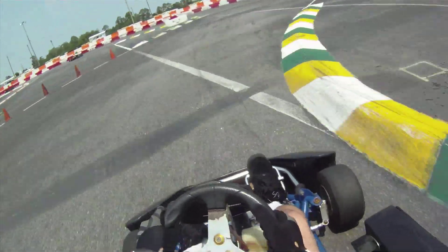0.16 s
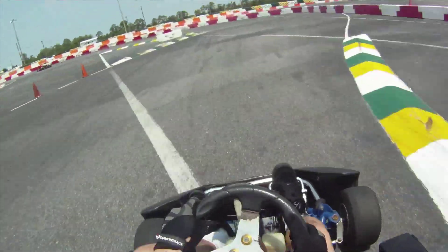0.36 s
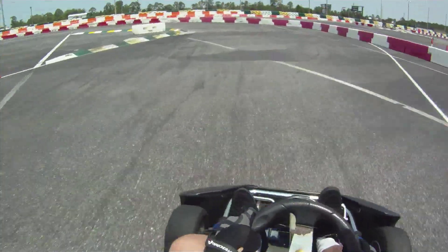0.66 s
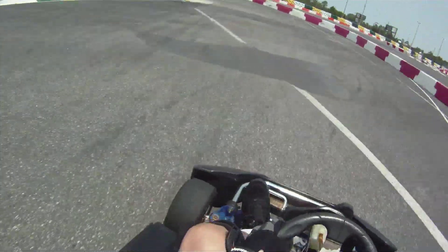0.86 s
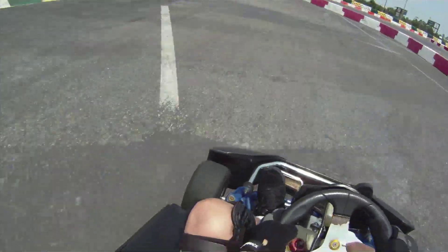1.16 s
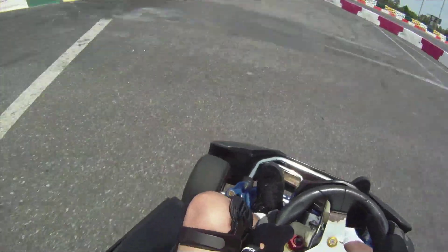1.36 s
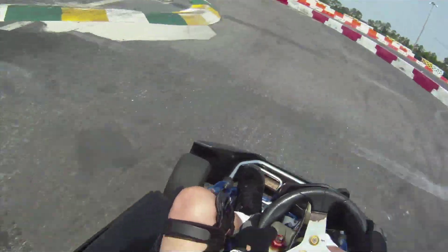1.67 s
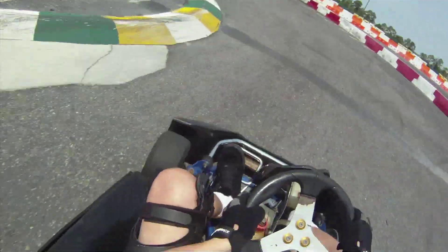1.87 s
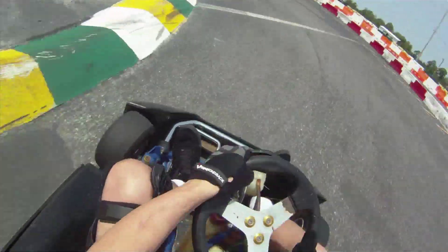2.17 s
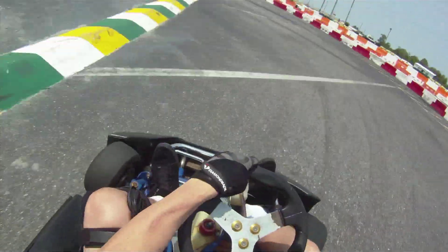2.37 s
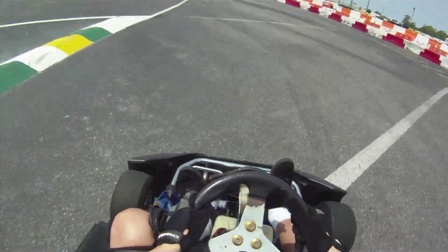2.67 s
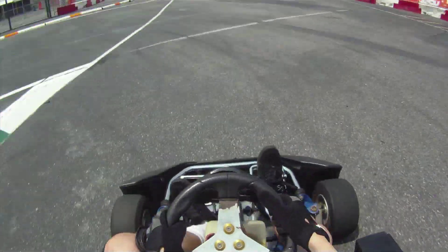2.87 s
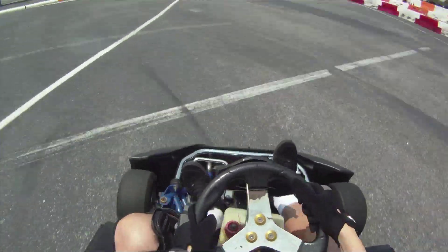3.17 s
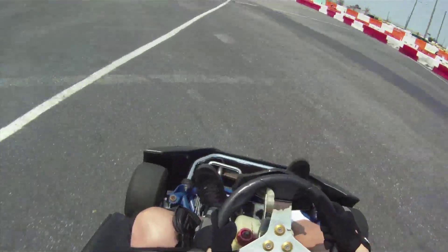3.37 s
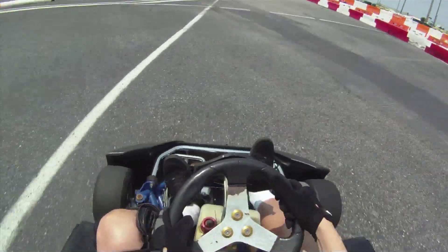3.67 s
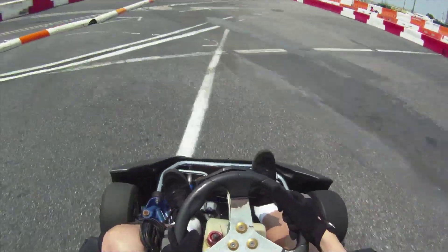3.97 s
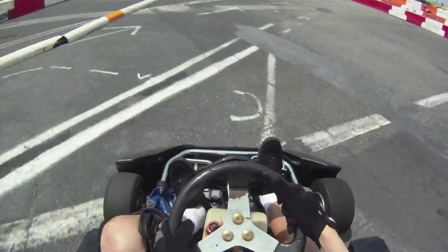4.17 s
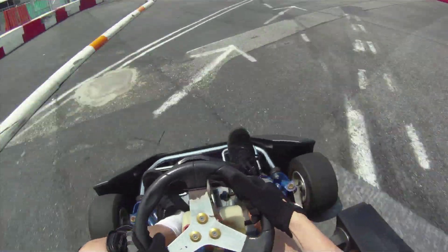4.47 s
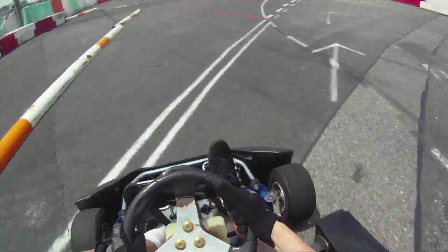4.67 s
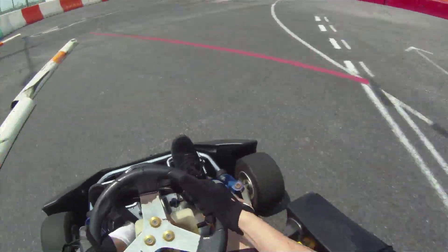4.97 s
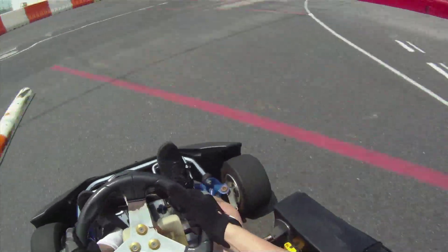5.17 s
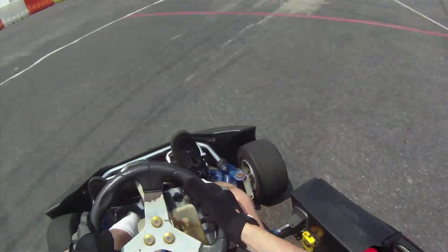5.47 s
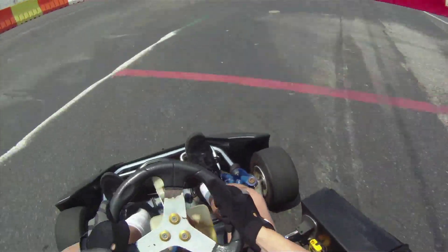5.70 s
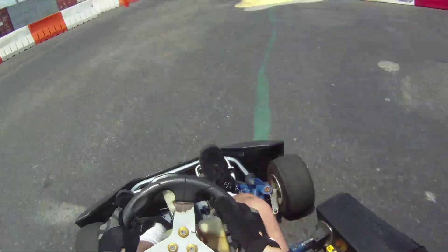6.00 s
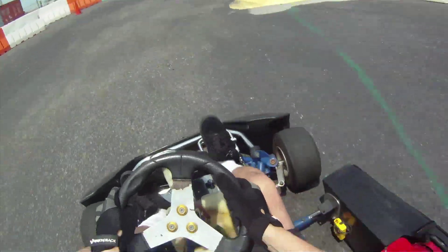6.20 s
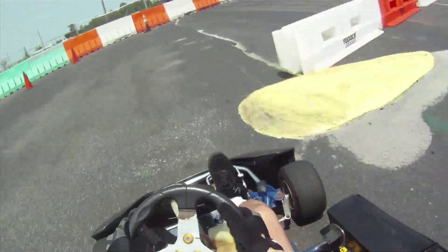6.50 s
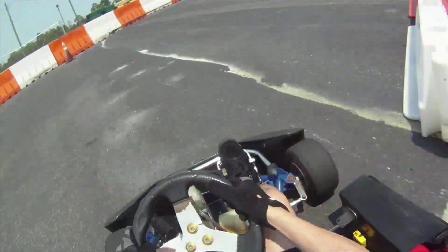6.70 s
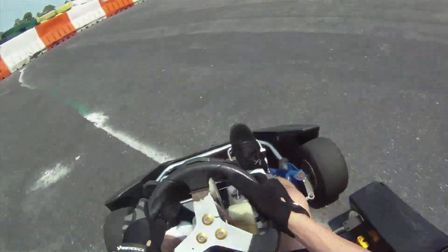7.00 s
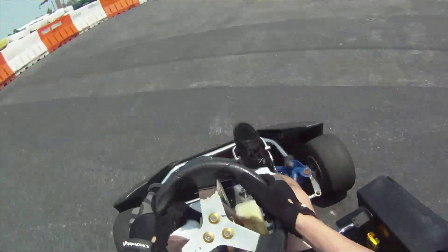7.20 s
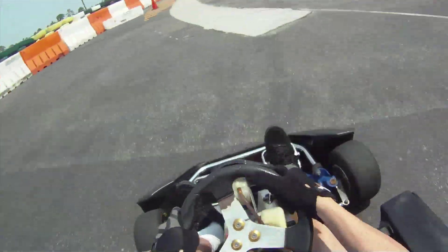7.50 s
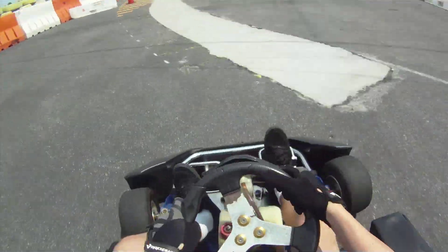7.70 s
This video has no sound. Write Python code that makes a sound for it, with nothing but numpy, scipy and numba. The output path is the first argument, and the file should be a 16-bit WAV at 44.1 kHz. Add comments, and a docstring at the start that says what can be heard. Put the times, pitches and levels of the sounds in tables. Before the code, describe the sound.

Close, on-board sound of a small go-kart lapping outdoors, with constant metallic rattling and a deep rumble shaking the microphone. The four-stroke engine starts off the throttle, then chugs and rasps under power, interrupted by one loud thump and crack. It builds speed, eases off with a buzzing rattle and picks up again. The brake gives a tiny squeak before more bumps thud through the chassis and knock the microphone's case.

```python
"""An outdoor kart track, heard from on board a lapping go-kart through the microphone of a cased camera.
The tyres drum underneath, road and crank shake the mount, and bumps thud in the chassis and knock the
case; the camera's limiter ducks after the hardest. Chain, engine parts and a loose panel clatter on, also
off the throttle, and the brake squeals briefly. Close by, the single-cylinder four-stroke engine drones
through its silencer and rasps at each firing."""
import sys
import numpy as np
from scipy import signal
from scipy.fft import rfft, irfft
from scipy.io import wavfile
from scipy.ndimage import uniform_filter1d, map_coordinates
from numba import njit

SR = 44100
rng = np.random.default_rng(int(sys.argv[2]) if len(sys.argv) > 2 else 0)


def digitize_waveform(pressure):
    """Quantize a signal to 16-bit integers and store it at the path in sys.argv[1].

    Rows of a 2-D input are taken as channels; values are limited to [-1, 1].
    """
    field = np.atleast_2d(pressure).T
    bounded = np.clip(field, -1, 1)
    quanta = np.round(bounded * 32767).astype(np.int16)
    wavfile.write(sys.argv[1], SR, quanta)


N = 346185
TIME = np.arange(N) / SR


def undb(db):
    """Decibels to gain."""
    return 10 ** (np.asarray(db) / 20)


def unit(x):
    """Scale to rms 1."""
    return x / np.sqrt(np.mean(x ** 2))


def curve(table):
    """Rows of (time_s, value), joined by straight lines."""
    return np.interp(TIME, *np.transpose(table))


def held(start_s, end_s, ramp_s):
    """Rises from 0 to 1 around the start, holds, and falls back around the end."""
    return np.clip(.5 + np.minimum(TIME - start_s, end_s - TIME) / ramp_s, 0, 1)


def swells(table):
    """Bell-shaped rises, one for each (centre_s, height, half_width_s)."""
    return sum(height * np.exp(-((TIME - s) / width_s) ** 2) for s, height, width_s in table)


def walk(rate_hz):
    """Smooth random wander with spread 1."""
    hold = int(SR / rate_hz)
    steps = np.repeat(rng.standard_normal(N)[:N // hold + 1], hold)
    return unit(uniform_filter1d(uniform_filter1d(steps, hold), hold)[:N])


def grains(per_s, spread_db):
    """Dense tiny impacts of uneven size."""
    hits = (rng.random(N) < per_s / SR) * rng.choice([-1, 1], N)
    return unit(hits * undb(spread_db * np.clip(rng.standard_normal(N), -2, 2)))


def colour(x, spectrum, size=16384):
    """Minimum-phase filter through the given (pitch_hz, level_db) points."""
    hz, db = np.transpose(spectrum)
    grid = np.maximum(np.fft.rfftfreq(size, 1 / SR), 1)
    cepstrum = irfft(np.log(undb(np.interp(np.log(grid), np.log(hz), db))))
    cepstrum[1:size // 2] *= 2
    cepstrum[size // 2 + 1:] = 0
    return signal.fftconvolve(x, irfft(np.exp(rfft(cepstrum))))[:N]


def resonate(x, hz, *widths_hz):
    """Two-pole resonances in series, one for each width, with gain 1 at the centre."""
    for width_hz in widths_hz:
        x = signal.lfilter(*signal.iirpeak(hz, hz / width_hz, fs=SR), x)
    return x


def ringing(age, modes):
    """Decaying modes, age seconds after a blow."""
    return sum(undb(db) * np.sin(2 * np.pi * hz * age) * 1000 ** (-age / t60) for hz, t60, db in modes)


def struck(cycle, firing_hz, modes, lead_s, rise_s, scatter_db, detune):
    """Modes rung once an engine cycle, each time a little different in strength and pitch."""
    turn = cycle + lead_s * firing_hz
    firing, age = turn.astype(int), turn % 1 / firing_hz
    out = np.zeros(N)
    for hz, t60, db in modes:
        size, bend, phase = rng.standard_normal((N // 1000, 3))[firing].T
        tone = np.sin(2 * np.pi * (hz * (1 + detune * bend) * age + phase))
        out += undb(db + scatter_db * size) * tone * 1000 ** (-age / t60)
    return out * (1 - np.exp(-(age / rise_s) ** 2))


# Presses of the throttle pedal: down_s, up_s, load_db, opening_rasp_db
PEDAL_PRESSES = [(1.41, 5.37, 1, 5.5), (6.33, 6.88, -0.8, 3.5), (7.05, 7.9, -3.5, 3)]
def throttle(coast_db=-8, coast_rasp_db=-21, fade_db_per_s=3.0):
    """Firing strength and rasp in dB; the rasp is hardest as the pedal goes down, then mellows."""
    load_db, gas_db = coast_db, coast_rasp_db
    for down_s, up_s, db, rasp_db in PEDAL_PRESSES:
        pedal = held(down_s, up_s, ramp_s=0.032)
        load_db += pedal * (db - coast_db)
        gas_db += pedal * (rasp_db - fade_db_per_s * (TIME - down_s) - coast_rasp_db)
    return load_db, gas_db


def tyres(level_db=-49, pitch_hz=98, width_hz=85):
    """Below the microphone, the hard little tyres drum on the asphalt all the way."""
    drum = resonate(rng.standard_normal(N), pitch_hz, width_hz, width_hz)
    return undb(level_db) * unit(drum * undb(2.4 * walk(6)))


# Touches of the pad on the brake disc: centre_s, gain_db, half_width_s
PAD_TOUCHES = [(1.536, -2, 0.012), (6.865, -6, .02), (7.19, 1.5, 0.025), (7.732, 0, 0.006)]
# Tones of the squeal: pitch_hz, level_db
SQUEAL_TONES = [(2864, -37), (9135, -46)]
def brake(waver=0.0068):
    """A pad brushes the disc and squeals briefly."""
    touch = swells((s, undb(db), width_s) for s, db, width_s in PAD_TOUCHES)
    squeal = np.zeros(N)
    for hz, db in SQUEAL_TONES:
        phase = 2 * np.pi * np.cumsum(hz * (1 + waver * walk(400))) / SR
        squeal += undb(db) * unit(np.sin(phase))
    return touch * squeal


def chain(cycle, over_cruise_hz, load_db, mesh_order=26, whip_order=29):
    """The chain whines on its sprocket as it pulls; at higher revs it whips and rattles just above."""
    whine = unit(np.sin(2 * np.pi * mesh_order * cycle + 0.73 * walk(30)) * undb(2 * walk(13)))
    jerk = 1.77 * np.sin(2 * np.pi * cycle + .5 * walk(5))
    slack = 1.1 * walk(90) + walk(10)
    rattle = unit(np.sin(2 * np.pi * whip_order * cycle + jerk + slack) * undb(2 * walk(11)))
    whine_db, rattle_db = -56 - 1.7 * over_cruise_hz, -49 + over_cruise_hz
    return undb(load_db) * (undb(whine_db) * whine + undb(rattle_db) * rattle)


def power_stroke(cycle, load_db):
    """The jolt that each firing gives the frame."""
    return undb(load_db) * np.exp(3 * (np.cos(2 * np.pi * (cycle - .04)) - 1))


def engine_ticks(cycle, patterns=4, size=1700):
    """Contacts that come back at the same crank angles every cycle, in slowly changing strengths."""
    out = np.zeros(N)
    for _ in range(patterns):
        contacts = grains(per_s=2000, spread_db=2)[:size]
        out += walk(6) * map_coordinates(contacts, [cycle % 1 * size], order=3, mode="wrap")
    return unit(out)


# Resonances of the tubular frame: pitch_hz, width_hz, level_db
FRAME_MODES = [(969, 68, 0), (1170, 49, -1), (1640, 46, -9), (2090, 93, -1)]
def frame(surge, drift_s=0.000597):
    """The steel tubes ring under the rattling; their pitches shift a little as the frame flexes."""
    out = np.zeros(N)
    for hz, width_hz, db in FRAME_MODES:
        ring = resonate(grains(per_s=700, spread_db=1.5) * surge, hz, width_hz, 3 * width_hz)
        flexed = np.arange(N) + drift_s * SR * walk(6)
        out += undb(db) * unit(map_coordinates(ring, [flexed], order=1, mode="nearest"))
    return unit(out)


# Clatter of the running gear along the track: time_s, level_db
GEAR_LEVEL = [(0, -31.5), (.3, -31), (.76, -32.5), (.95, -36.5), (1.3, -38.5), (1.5, -35), (1.9, -33.5),
              (2.35, -32), (2.9, -35.5), (3.5, -35.5), (4.5, -32.5), (5.34, -31.5), (5.43, -33.5),
              (5.75, -36.5), (5.95, -35), (6.3, -33.5), (6.9, -32), (7.4, -30.5), (7.85, -36)]
# Rattles in the coasting drive: centre_s, extra_clatter_db, extra_panel_db, half_width_s
DRIVE_RATTLES = [(0.301, 2, 5, 0.011), (0.474, 1, 12, .01), (0.717, 3.5, -13, 0.01),
                 (1.196, 2.5, -1, 0.031), (1.34, 4, 9, 0.013), (5.87, 3.5, 3, 0.014), (5.945, 6, 22, 0.02),
                 (6.02, 0, 7, 0.017), (6.154, 1.5, 13, 0.0096), (6.223, 7, 17, 0.016), (6.33, 4, 1, 0.0076)]
# Tone of the clatter and of the hiss above it: pitch_hz, level_db
CLATTER_SPECTRUM = [(60, -25), (150, -6.5), (260, -8.5), (520, -10), (820, -7), (965, 0.5), (1075, 0.5),
                    (1190, 0.5), (1480, -5.5), (1650, -4), (1850, -8), (2080, -1.5), (2450, -5),
                    (2720, -5.5), (3150, -15), (4200, -29), (6000, -44)]
HISS_SPECTRUM = [(2500, -6.5), (3150, 2.5), (3450, 11), (3850, 7.5), (4300, -1.5), (4900, 5.5), (5700, -2),
                 (6400, -1.5), (7050, 2), (7650, -4.5), (8400, 3.5), (8850, 0.5), (9400, 4.5), (9900, 7.5),
                 (10300, -3), (11000, -33)]
def running_gear(cycle, load_db, throb=0.48):
    """Valve gear ticks with the crank and the tyres patter at random; each power stroke jolts the parts."""
    rattle_db = swells((s, db, width_s) for s, db, _, width_s in DRIVE_RATTLES)
    surge = (1 + throb * power_stroke(cycle, load_db)) * undb(1.17 * walk(70))
    patter = unit(colour(grains(per_s=1800, spread_db=1.0) * surge, CLATTER_SPECTRUM))
    # the valve gear's small parts give no bass
    ticks = signal.lfilter(*signal.butter(2, 380, "high", fs=SR), engine_ticks(cycle) * surge)
    valves = unit(colour(ticks, CLATTER_SPECTRUM))
    hiss = unit(colour(grains(per_s=8000, spread_db=1.5) * surge, HISS_SPECTRUM))
    parts = undb(-2.5) * patter + undb(-5) * valves + undb(-9.5) * hiss + undb(-7) * frame(surge)
    return undb(curve(GEAR_LEVEL) + rattle_db) * parts


def panel(cycle, over_cruise_hz, load_db, pitch_hz=2140, width_hz=230, throb=0.29, relative_db=-14):
    """The engine's ticks buzz a loose panel, more at high revs and when the slack drive rattles."""
    ticks = engine_ticks(cycle) * (1 + throb * power_stroke(cycle, load_db))
    buzz = unit(resonate(ticks, pitch_hz, width_hz, 2 * width_hz))
    rattle_db = swells((s, db, width_s) for s, _, db, width_s in DRIVE_RATTLES)
    drive_db = 1.8 * over_cruise_hz - 0.14 * load_db + rattle_db
    return undb(curve(GEAR_LEVEL) + relative_db + drive_db) * buzz


# Tight corners of the track: entry_s, exit_s, extra_db
TIGHT_CORNERS = [(1.798, 2.887, 7.5), (6.0, 8.1, 8)]
# Rough patches of asphalt: centre_s, extra_db, half_width_s
ROUGH_PATCHES = [(.28, 8, 0.1), (.55, 5.5, 0.11), (2.12, 11, 0.034), (2.47, 8.5, 0.094), (4.88, 10, 0.053),
                 (6.42, 7, 0.12), (7.7, 6.5, 0.11)]
# Tone of the road's jolts: pitch_hz, level_db
JOLT_SPECTRUM = [(10, -21.5), (20, -1.5), (30, -4.5), (40, 5), (50, -8.5), (62, -17.5), (85, -31),
                 (130, -42), (200, -39.5), (400, -58)]
def road_shake(straight_db=-35.5):
    """The road jolts the camera, harder on rough asphalt and where the tyres scrub through corners."""
    corner_db = sum(db * held(entry_s, exit_s, ramp_s=0.55) for entry_s, exit_s, db in TIGHT_CORNERS)
    jolts = unit(colour(rng.standard_normal(N), JOLT_SPECTRUM))
    # the rubber of the mount stiffens against large swings
    shake = unit(colour(np.tanh(0.6 * jolts), [(10, -2.5), (60, 2), (140, 1), (400, -12), (1200, -29)]))
    return undb(straight_db + corner_db + swells(ROUGH_PATCHES)) * shake


# Shake of the crank at the camera: time_s, level_db
CRANK_LEVEL = [(0, -41.5), (1.1, -41), (1.6, -30.5), (2.55, -29.5), (3, -32.5), (4.1, -36), (5, -50.5),
               (5.6, -32), (6.1, -35), (6.5, -25.5), (7.4, -22), (7.85, -29.5)]
def crank_shake(cycle):
    """The crank turns twice per firing and hums through the mount into the microphone."""
    hum = np.sin(2 * np.pi * (2 * cycle - .03))
    return undb(curve(CRANK_LEVEL)) * unit(hum * undb(1.13 * walk(3.86)))


# Bumps in the track: start_s, level_db, push_s
TRACK_BUMPS = [(1.474, -25, 0.0041), (2.357, -13.5, 0.014), (2.439, 0.5, 0.0097), (7.594, -10, 0.0079),
               (7.6952, -5, 0.00507), (7.705, -14, 0.0049), (7.84, -6, 0.0094)]
# Modes of the camera mount: pitch_hz, t60_s, level_db
MOUNT_MODES = [(39.43, 1, -7.5), (87, 0.15, -14), (122.4, 0.12, -5.5)]
def mount_swing(rise_s=0.0035):
    """Each bump pushes the camera one way and back, and it swings on in its mount."""
    out = np.zeros(N)
    for start_s, db, push_s in TRACK_BUMPS:
        age = np.maximum(TIME - start_s, 0)
        push = 0.72 * np.sin(2 * np.pi * np.minimum(age / push_s / 2, 1))
        out -= undb(db) * (push + ringing(age, MOUNT_MODES)) * (1 - np.exp(-age / rise_s))
    return out


# Modes of the chassis: pitch_hz, t60_s, level_db
CHASSIS_MODES = [(507, 0.0084, 0), (956, 0.017, 0), (1900, 0.005, -15), (2650, 0.012, -19)]
def chassis_thud(start_s=7.7008, gain_db=-2.5, rise_s=0.00032):
    """The chassis bottoms out on a bump: one heavy, dull blow with a soft contact."""
    age = np.maximum(TIME - start_s, 0)
    return undb(gain_db) * ringing(age, CHASSIS_MODES) * (1 - np.exp(-(age / rise_s) ** 2))


# Knocks right at the microphone: start_s, peak_db, high_cut_hz, contact_s, low_cut_hz
CASE_KNOCKS = [(1.777, -20, 7000, 0.0036, 1800), (2.4331, 5.5, 5060, 0.00055, 770),
               (2.4342, 1, 4500, 0.00034, 610), (2.444, 1, 5100, 0.00081, 1600),
               (6.0924, -5.5, 5400, 0.00029, 1270), (7.5814, -5, 4500, 0.00071, 1050),
               (7.605, -14.5, 6000, 0.00054, 1100), (7.6703, -23, 9000, .0007, 720),
               (7.6854, -11, 3000, 0.00052, 700), (7.7114, -6, 3500, 0.00022, 720),
               (7.842, -12.5, 6000, 0.0032, 724)]
# Modes of the camera case: pitch_hz, t60_s, level_db
CASE_MODES = [(570, 0.011, 7.5), (1030, 0.025, -3.5), (1206, 0.017, 0), (1540, 0.0039, 2), (2170, 0.01, 1),
              (2460, 0.022, -4.5), (2760, 0.008, -9), (3480, 0.0059, -10.5), (4540, 0.0059, -17),
              (8100, 0.005, -6), (9680, 0.011, 3.5)]
def case_knocks(crunch=0.25, crack=0.3):
    """The case hits its mount, grinds and rings; each knock has its own brightness and length of grind."""
    out = np.zeros(N)
    age = TIME[:SR // 10]
    for start_s, peak_db, high_cut_hz, contact_s, low_cut_hz in CASE_KNOCKS:
        force = crunch * rng.standard_normal(len(age)) * np.exp(-age / contact_s)
        force[0] += 1
        ring = signal.fftconvolve(force, ringing(age, CASE_MODES))[:len(age)]
        blow = ring + crack * np.diff(force, prepend=0)
        blow = signal.lfilter(*signal.butter(2, high_cut_hz, fs=SR), blow)
        blow = signal.lfilter(*signal.butter(2, low_cut_hz, "high", fs=SR), blow)
        start = int(start_s * SR)
        out[start:start + len(age)] += (undb(peak_db) * blow / np.abs(blow).max())[:N - start]
    return out


# Modes of the engine's metal parts: pitch_hz, t60_s, level_db
METAL_MODES = [(1110, 0.05, -41), (2085, 0.08, -35.5), (2293, 0.05, -34.5), (2570, 0.048, -32.5)]
# Strength of their clank along the track: time_s, gain_db
CLANK_GAIN = [(0, -4), (2.3, -20), (2.7, 0.5), (3.7, -1.5), (5, -1), (5.8, -3), (6.4, 5), (7.85, -5)]
def engine_clank(cycle, firing_hz, load_db):
    """Each power stroke sets the engine's metal parts clanking, harder under load."""
    ring = struck(cycle, firing_hz, METAL_MODES, lead_s=0.0042, rise_s=0.0034, scatter_db=2.5, detune=0.015)
    return undb(load_db + curve(CLANK_GAIN)) * ring


# Tone of the silencer: pitch_hz, level_db
SILENCER_SPECTRUM = [(60, -13), (100, -2), (120, -2), (135, 4.5), (160, -0.5), (188, -8), (225, -9),
                     (280, -5.5), (340, -11.5), (410, -6.5), (500, -21.5), (600, -15)]
def silencer(cycle, firing_hz, over_cruise_hz, load_db, gas_db, level_db=-41, odd_db=-1.5, rough_db=2.2):
    """The silencer smooths the firings into a wavering drone, louder under load and at high revs."""
    orders = np.zeros(N)
    for order in range(3, 21):
        tone_db = np.interp(order * firing_hz, *np.transpose(SILENCER_SPECTRUM))
        gain = undb(tone_db + odd_db * (order % 2) + rough_db * walk(16))
        orders += gain * np.sin(2 * np.pi * (order * cycle + rng.random()) + 0.12 * walk(25))
    effort_db = 0.48 * load_db + 0.14 * gas_db + 0.6 * over_cruise_hz
    return undb(level_db + effort_db) * unit(orders * undb(1.26 * walk(25)))


# Firings that crack harder or fall flat: time_s, extra_db
STRAY_FIRINGS = [(1.438, 2), (1.479, 2), (1.519, -3.5), (1.557, -4), (1.598, -1), (1.637, -3), (1.676, 1.5),
                 (1.715, 2), (1.753, 1), (1.792, 1), (1.83, -5), (1.908, 3), (1.948, 3.5), (1.984, 2.5),
                 (2.022, -4), (2.211, 4), (2.893, 3.5), (2.935, 4), (3.487, 3.5), (4.947, 6), (6.404, 4)]
# Resonances of the exhaust pipe: pitch_hz, width_hz, level_db
PIPE_BANDS = [(740, 230, -10), (1155, 390, -0.5), (2260, 410, -5), (3493, 140, -5.5), (4720, 250, -10),
              (5580, 120, -10), (6340, 230, -13), (7160, 170, -11.5), (8410, 110, -11.5), (9490, 190, -14)]
# Ringing of the pipe after each pressure wave: pitch_hz, t60_s, level_db
CHUG_MODES = [(1085, 0.02, -30), (3585, 0.032, -40.5), (8420, 0.027, -48)]
def exhaust(cycle, firing_hz, load_db, gas_db, lead_s=0.0048, rise_s=0.002, fall_s=0.0034):
    """Close by, the valve opens once a cycle: the pressure wave rings the pipe, the gas crackles in it."""
    turn = cycle + lead_s * firing_hz
    firing, age = turn.astype(int), turn % 1 / firing_hz
    # with the throttle shut the firings grow uneven
    uneven_db = (0.84 + 0.07 * np.clip(-load_db, 0, 12)) * rng.standard_normal(N)[firing]
    stray_db = sum(db * (firing == round(np.interp(s, TIME, turn))) for s, db in STRAY_FIRINGS)
    strength = undb(load_db + gas_db + stray_db + uneven_db)
    puff = (1 - np.exp(-(age / rise_s) ** 2)) * np.exp(-age / fall_s)
    gas = unit(puff) * grains(per_s=8000, spread_db=2.0) * strength
    rasp = sum(undb(db) * resonate(gas, hz, width_hz, 3 * width_hz) for hz, width_hz, db in PIPE_BANDS)
    chug = struck(cycle, firing_hz, CHUG_MODES, lead_s=0.00052, rise_s=0.0013, scatter_db=2, detune=0.027)
    # some of the jet reaches the microphone directly, without ringing the pipe
    jet = resonate(gas, 4600, 7000)
    return strength * chug + undb(-27) * rasp + undb(-57) * jet


# Engine speed along the track: time_s, firing_hz
ENGINE_SPEED = [(0, 24.1), (0.7, 24.2), (1.4, 24.77), (1.6, 25.34), (1.9, 26.05), (2.15, 26.77),
                (2.4, 25.9), (2.7, 23.81), (3, 23.46), (3.3, 23.54), (3.6, 23.97), (4, 24.87), (4.5, 25.7),
                (5, 27.09), (5.3, 28.34), (5.8, 25.21), (6.3, 24.55), (6.6, 24.42), (6.8, 23.79),
                (7, 23.02), (7.3, 23.5), (7.6, 23.91), (7.85, 24.3)]
def scene(cruise_hz=24.93):
    """The kart from on board, in mono; one engine cycle times the firings, ticks, chain and crank."""
    firing_hz = curve(ENGINE_SPEED)
    over_cruise_hz = firing_hz - cruise_hz
    cycle = np.cumsum(firing_hz) / SR
    load_db, gas_db = throttle()
    engine = silencer(cycle, firing_hz, over_cruise_hz, load_db, gas_db)
    engine += exhaust(cycle, firing_hz, load_db, gas_db) + engine_clank(cycle, firing_hz, load_db)
    chassis = chain(cycle, over_cruise_hz, load_db) + running_gear(cycle, load_db) + tyres()
    chassis += panel(cycle, over_cruise_hz, load_db) + brake() + chassis_thud()
    camera = road_shake() + crank_shake(cycle) + mount_swing() + case_knocks()
    return (engine + chassis + camera)[None]


@njit
def follow_peaks(x, release):
    """Peak follower: jumps up at once, sinks slowly."""
    out, peak = np.empty(len(x)), 0.
    for i in range(len(x)):
        peak = max(abs(x[i]), peak * (1 - release))
        out[i] = peak
    return out


def record(dry, notch_hz=6020, notch_width_hz=650, threshold=0.6, release_s=0.19, top_hz=10600):
    """The case swallows a treble band; a limiter ducks after peaks and rounds their tips; the top is cut."""
    cased = dry[0] - resonate(dry[0], notch_hz, notch_width_hz)
    peaks = follow_peaks(cased, 1 / (release_s * SR))
    duck = 1 - np.minimum(1, threshold / (peaks + 1e-9))
    attack = np.hanning(SR // 200)
    gain = 1 - np.convolve(duck, attack / attack.sum())[:N]
    rounded = .75 * np.tanh(cased * gain / .75)
    return signal.sosfilt(signal.ellip(8, .2, 70, top_hz, fs=SR, output="sos"), rounded)[None]


dry = scene()
out = record(dry)
digitize_waveform(out)
```